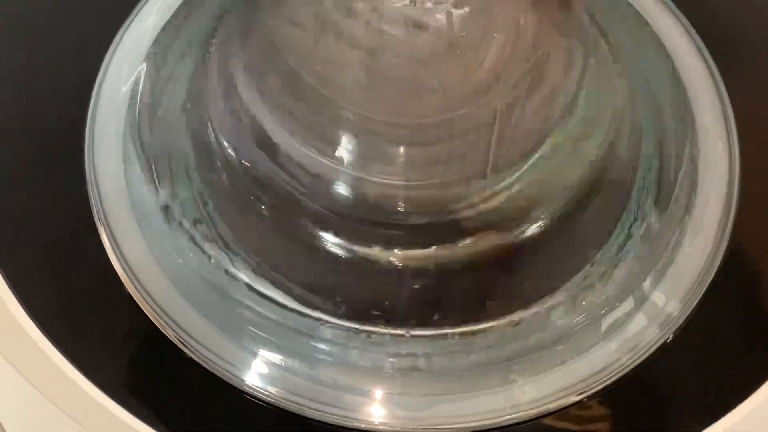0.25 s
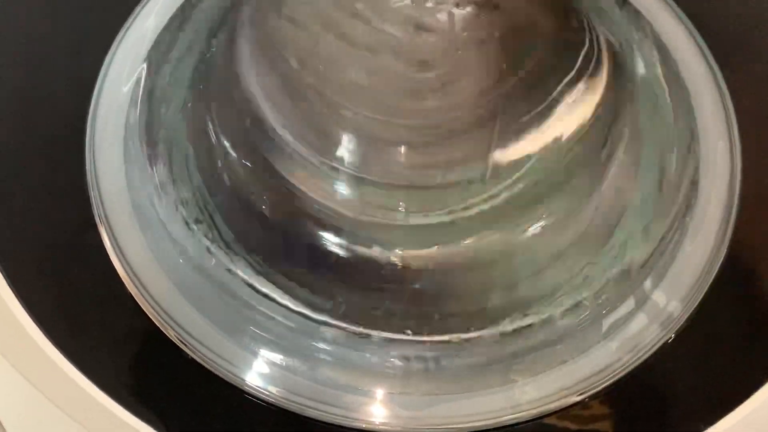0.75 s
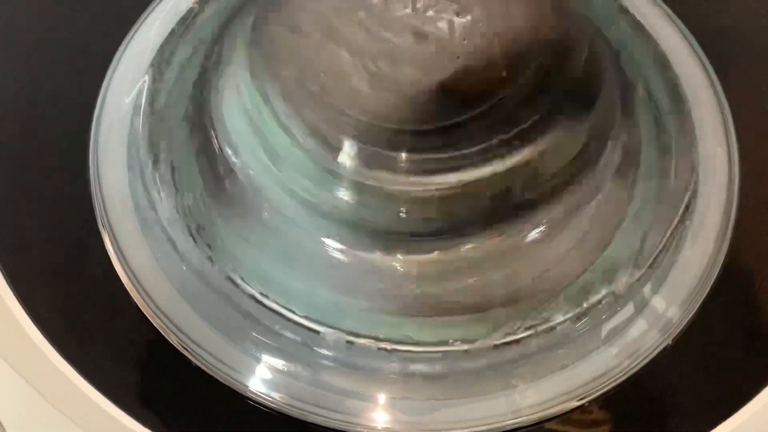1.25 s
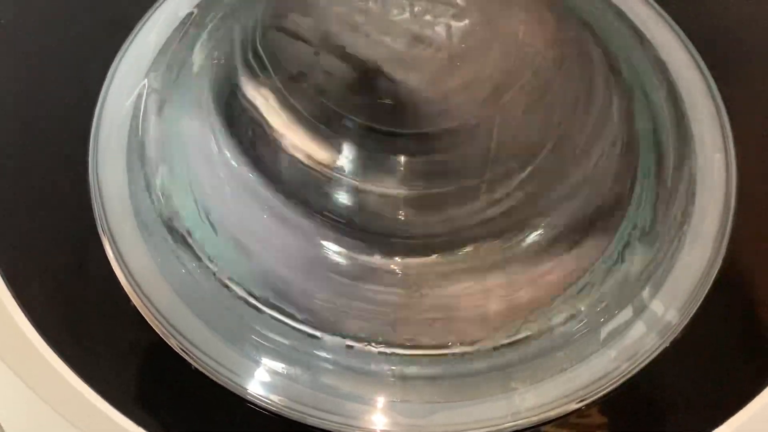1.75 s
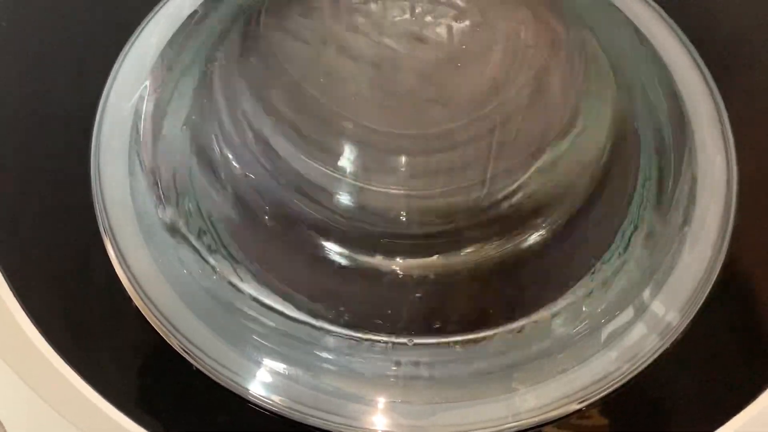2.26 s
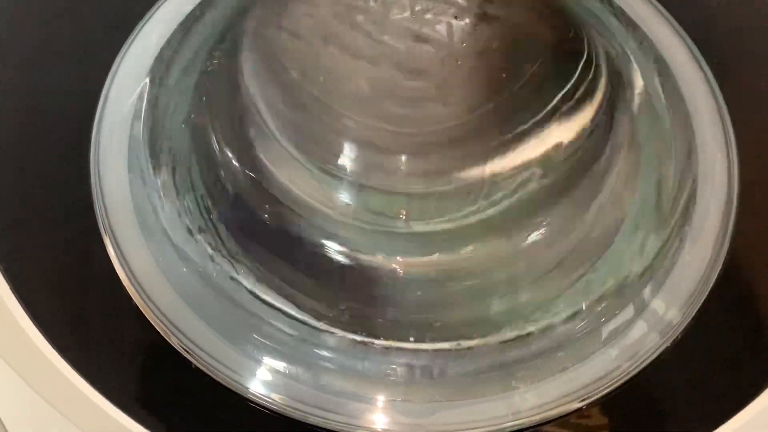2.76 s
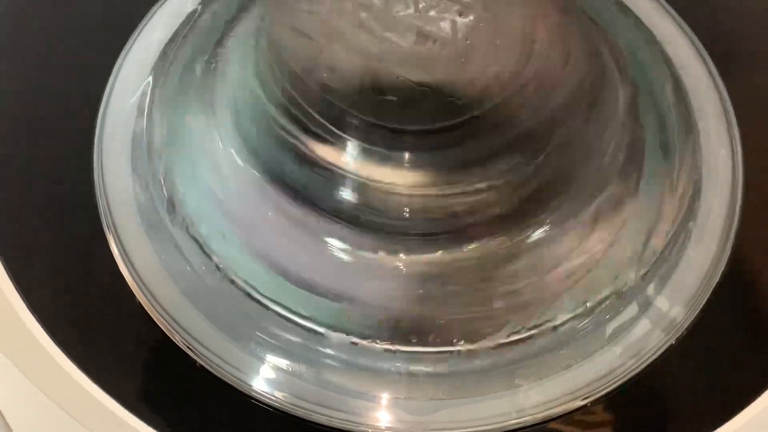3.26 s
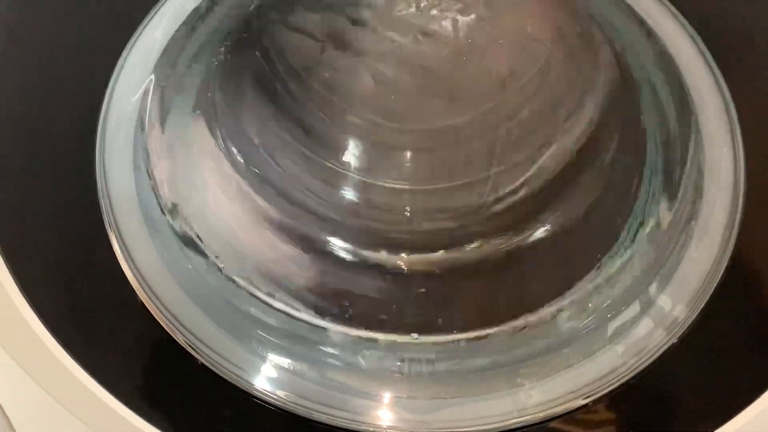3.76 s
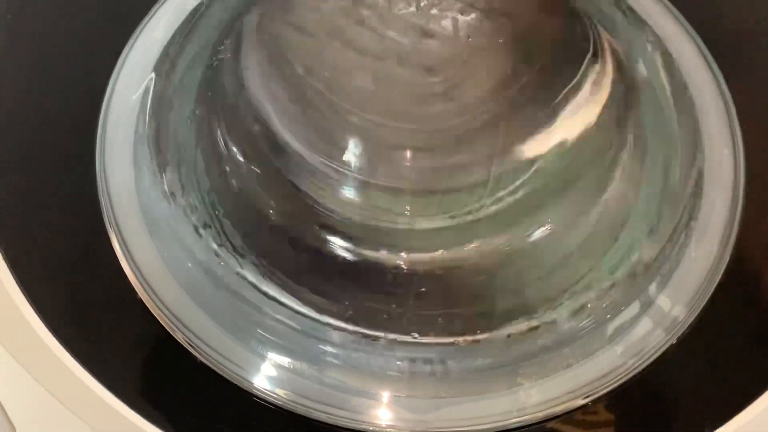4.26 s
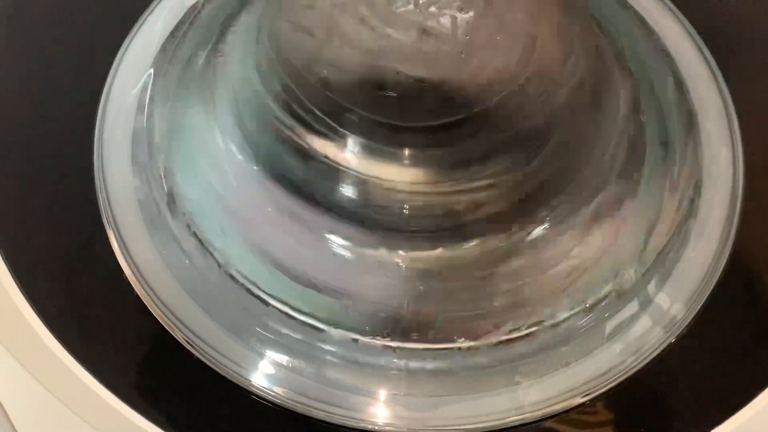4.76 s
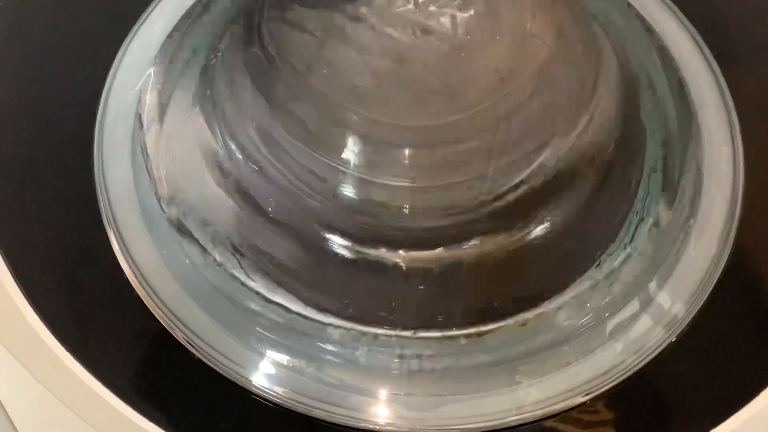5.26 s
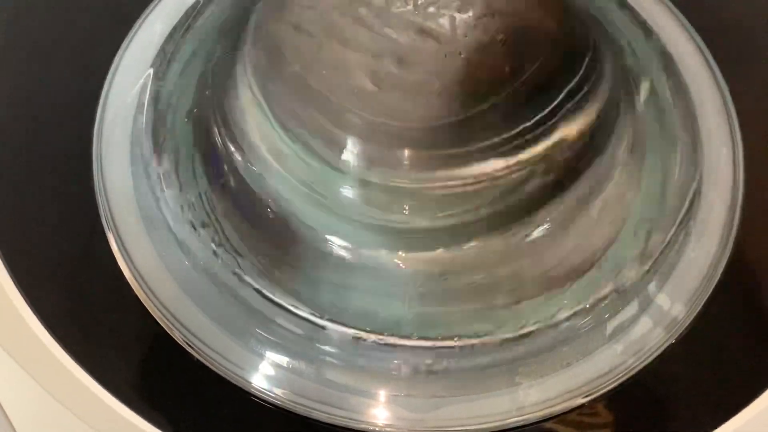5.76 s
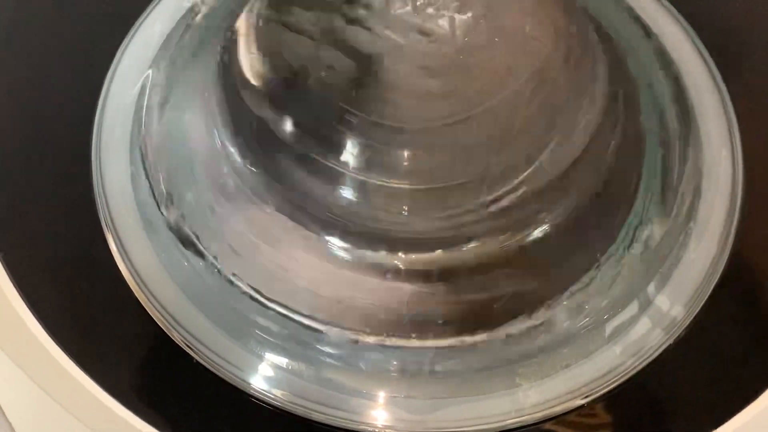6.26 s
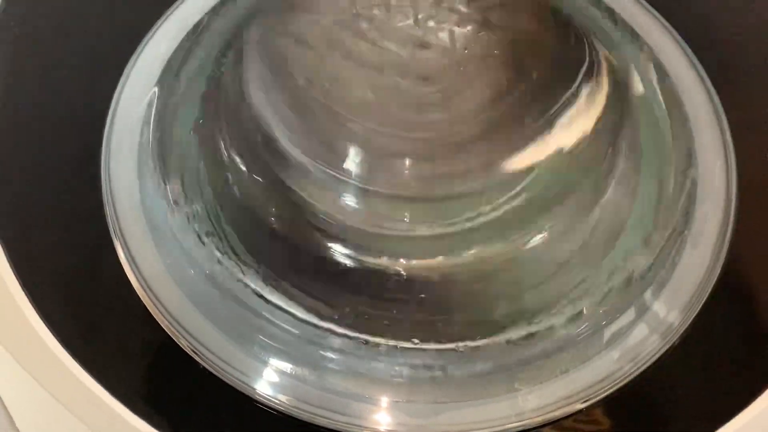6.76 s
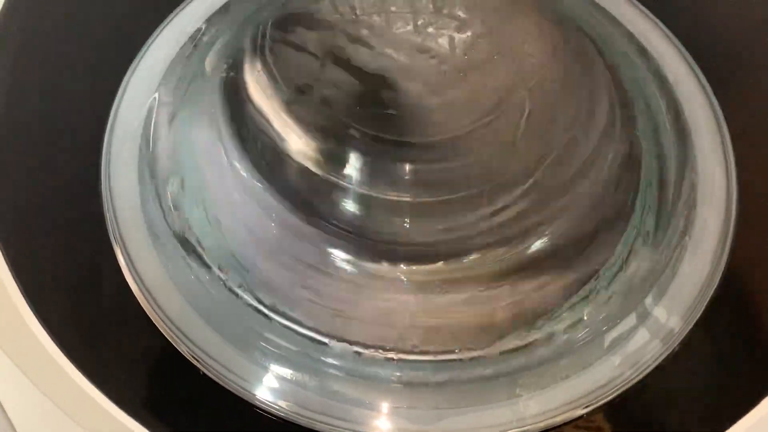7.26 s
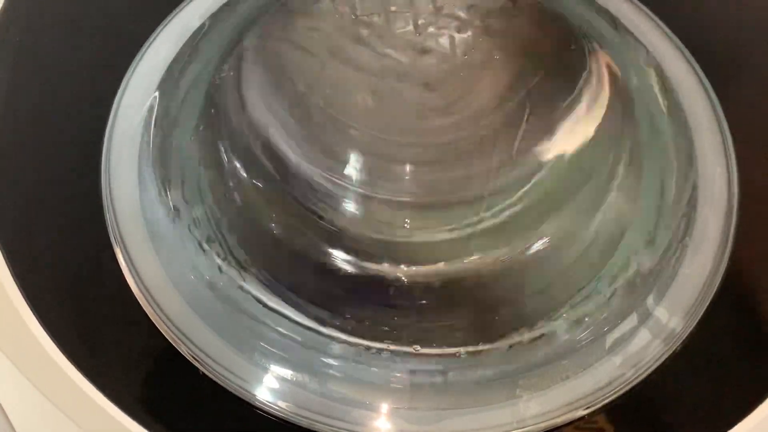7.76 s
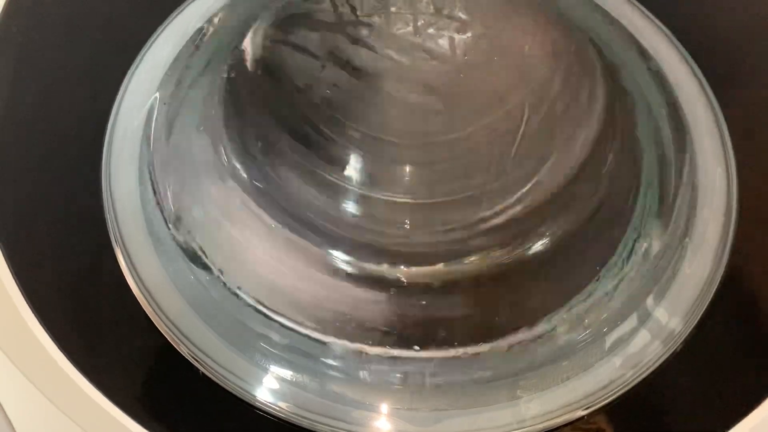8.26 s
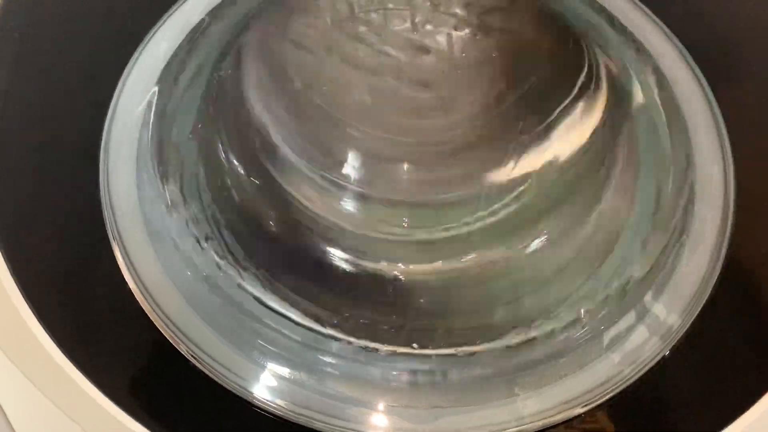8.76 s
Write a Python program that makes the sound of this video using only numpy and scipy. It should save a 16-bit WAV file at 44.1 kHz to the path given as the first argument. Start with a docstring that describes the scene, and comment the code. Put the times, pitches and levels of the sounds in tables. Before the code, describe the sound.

Close to a washer door, rapid low drum knocks pulse steadily and slowly quicken, with bearing rumble, rushing air and thin motor hum.

```python
"""Washing machine gaining spin speed

A front-loading washing machine speeds up slowly in its spin, heard from close to the door.
Each turn, timed blows of the unbalanced drum ring decaying cabinet modes; bearings rumble as turn-locked noise.
Air and motor noise rushes with spectral peaks and dips; a thin whirr of narrow noise comes and goes.
The belt-driven motor hums at multiples of its current; its inverter whines in sidebands, highest near 16 kHz."""
import sys
import numpy as np
from scipy import signal
from scipy.fft import rfft, irfft
from scipy.io import wavfile
from scipy.ndimage import uniform_filter1d

SR = 44100
rng = np.random.default_rng(int(sys.argv[2]) if len(sys.argv) > 2 else 0)


def digitize_waveform(pressure):
    """Quantize a signal to 16-bit integers and store it at the path in sys.argv[1].

    Rows of a 2-D input are taken as channels; values are limited to [-1, 1].
    """
    field = np.atleast_2d(pressure).T
    bounded = np.clip(field, -1, 1)
    quanta = np.round(bounded * 32767).astype(np.int16)
    wavfile.write(sys.argv[1], SR, quanta)


N = 397782

START_TURNS = -.0623  # drum angle at the outset, from the main thump
START_TURNS_PER_S, GAIN_TURNS_PER_S2 = 6.302, .09025
CURRENT_PER_TURN = 21.09  # cycles of motor current per drum turn


def gain_of(db):
    """dB to gain."""
    return 10 ** (np.asarray(db) / 20)


def evened(x):
    """Scales to rms 1."""
    return x / np.sqrt(np.mean(x ** 2) + 1e-20)


def read(points, hz):
    """Interpolates a table on a log-frequency axis."""
    f, value = np.transpose(points)
    return np.interp(np.log(hz + 1), np.log(f + 1), value)


def drift(per_s):
    """Slow random signal from smoothed knots of rms 1."""
    count = int(N / SR * per_s) + 8
    knots = uniform_filter1d(rng.standard_normal(4 * count), size=4)
    return np.interp(np.arange(N) / SR * per_s * 4, np.arange(4 * count), evened(knots))


def speed(s):
    """Drum speed in turns/s, rising linearly with time in s."""
    return START_TURNS_PER_S + GAIN_TURNS_PER_S2 * s


def drum():
    """Drum angle in turns, the running sum of speed."""
    return START_TURNS + np.cumsum(speed(np.arange(N) / SR)) / SR


# chosen left-right likeness, alternating sides of zero in the treble, clipped to +-.99 when read:
# (frequency [Hz], likeness [-])
LIKENESS = [(30, .9), (60, .975), (130, .95), (290, .9), (500, .45), (770, .3), (1200, 0), (1800, 0),
            (2700, .2), (4200, 0), (6820, .14), (7500, -.1), (8700, -3.5), (11000, 3.5), (13200, -2.6),
            (15000, 2)]


def shaped(x, spectrum_db, paths=.5):
    """Colours two noises and mixes them to a set left-right likeness per frequency; rms 1."""
    hz = np.fft.rfftfreq(N, 1 / SR)
    same = np.clip(read(LIKENESS, hz), -.99, .99)
    mid, side = rfft(x)
    # part of the difference is the same sound by other paths, its phase turning with frequency
    phase_steps = 1.3 * np.cumsum(rng.standard_normal(SR // 100))
    turn_rad = np.interp(hz, np.arange(0, SR / 2, 50), phase_steps)
    other_paths = paths * mid * np.exp(1j * turn_rad)
    side = other_paths + np.sqrt(1 - min(paths, .99) ** 2) * side
    colour = gain_of(spectrum_db(hz))
    mid = mid * colour * np.sqrt(1 + same)
    side = side * colour * np.sqrt(1 - same)
    return evened(irfft(np.array([mid + side, mid - side]), N))


# air and motor noise: (frequency [Hz], relative density [dB per Hz])
AIR = [(190, -44), (330, -2), (492, -12), (745, -11), (862, -15), (972, -14), (1050, -14), (1530, -12.5),
       (1800, -13.5), (2100, -18), (2510, -24), (3140, -23), (3700, -24.5), (4570, -29), (6820, -32.5),
       (7600, -35.5), (8000, -102), (10400, -99), (17600, -120)]
AIR_DB = -42
# peaks and dips in the rush: (frequency [Hz], width [Hz], level relative to the rush [dB])
PEAKS_AND_DIPS = [(444, 25, 5), (482, 20, -4), (748, 30, 2), (780, 110, 2), (952, 18, 4), (980, 18, 6),
                  (1178, 25, 3.5), (1253, 20, 5), (1292, 30, -5), (1450, 50, 1.5), (1826, 20, 3),
                  (2095, 60, 3), (2240, 35, 5.5), (2300, 50, -2), (2385, 70, 5), (2480, 40, -3),
                  (2555, 25, 4), (2662, 40, 5), (2830, 45, 6), (3135, 80, 4), (3225, 40, 3), (6640, 180, 4)]
# top of the rush: (frequency [Hz], relative density [dB per Hz])
TOP = [(7000, -20), (7800, -3), (8600, 0), (9400, -6), (10100, -4), (10900, -9), (12000, -6), (13400, -6),
       (14300, -11), (15800, -9)]
TOP_DB = -64.5


def rush(angle, throb_db=-0.14, lead_turns=0.042, lag_turns_per_octave=0.03, rise_db=1.5,
         waver_db=0.67, low_throb_db=0.67, top_throb_db=1.5, gust_db=0.18):
    """Air and motor noise with peaks and dips, in patches; it swells once a turn, low bands first."""
    def air_colour(hz):
        bumps_db = sum(db / (1 + (2 * (hz - f) / width) ** 4) for f, width, db in PEAKS_AND_DIPS)
        return read(AIR, hz) + bumps_db

    def top_colour(hz):
        return read(TOP, hz) - 60 * (hz < TOP[0][0])

    air = gain_of(AIR_DB) * shaped(rng.standard_normal((2, N)), air_colour)
    top = gain_of(TOP_DB) * shaped(rng.standard_normal((2, N)), top_colour)
    top = top * gain_of(rise_db * np.linspace(-1, 1, N) + top_throb_db * drift(9))  # brightens, flickers

    hz, t, z = signal.stft(air + top, SR, nperseg=512, noverlap=384)
    band_hz = hz[:, None]
    frame = np.minimum(t * SR, N - 1).astype(int)
    patches = uniform_filter1d(rng.standard_normal(z.shape[1:]), 3, axis=0)
    patches = evened(uniform_filter1d(patches, 15, axis=1))
    lag_turns = lag_turns_per_octave * np.log2(band_hz / 1000 + .1)
    place = np.interp(t, np.arange(N) / SR, angle) + lead_turns - lag_turns
    depth_db = .4 + throb_db + low_throb_db / (1 + (band_hz / 1300) ** 6)
    swell_db = depth_db * np.cos(2 * np.pi * place)
    for f, _, _ in PEAKS_AND_DIPS:  # the band around each rises and falls in its own time
        near = np.exp(-.5 * ((band_hz - f) / 90) ** 2)
        swell_db = swell_db + waver_db * near * drift(5.5)[frame]
    swell_db = swell_db + 1.9 * patches + gust_db * drift(8)[frame]
    return signal.istft(z * gain_of(swell_db), SR, nperseg=512, noverlap=384)[1][:, :N]


# bearings through the cabinet: (frequency [Hz], relative density [dB per Hz])
BEARINGS = [(25, -16), (32, -22), (45, -16), (60, -9), (80, 0), (100, -2), (125, -2), (160, -2), (200, -4),
            (250, -8), (310, -8), (400, -17.5), (600, -20.5), (1200, -76)]
BEARINGS_DB = -36.5


def rumble(angle, memory_turns=3.5, fresh=.4, throb_db=1.0, lead_turns=.1):
    """Bearing roughness repeats each turn, changes over a few turns; loudest under the heavy side."""
    size, count = 512, int(angle[-1]) + 3  # points per turn, turns
    fade = np.exp(-.5 * (np.arange(-12, 13) / memory_turns) ** 2)[None, :, None]
    repeated = evened(signal.fftconvolve(rng.standard_normal((2, count, size)), fade, "same"))
    pattern = (repeated + fresh * rng.standard_normal((2, count, size))).reshape(2, -1)
    point = (angle + 1) * size
    rough = np.array([np.interp(point, np.arange(count * size), p) for p in pattern])
    throb = gain_of(throb_db * np.cos(2 * np.pi * (angle + lead_turns)))
    return gain_of(BEARINGS_DB) * throb * shaped(rough, lambda hz: read(BEARINGS, hz))


# thin whirr that comes and goes, before its throb: (time [s], level [dB])
WHIRR_LEVEL = [(0.0, -69), (0.05, -62), (0.58, -53), (0.63, -66), (0.9, -54), (1.8, -70), (1.9, -46),
               (2.18, -66), (2.28, -50), (2.53, -67), (2.93, -58), (6.97, -56), (7.07, -70), (7.12, -50),
               (7.67, -51), (7.69, -70), (8.27, -53), (9.0, -58)]
WHIRR_HZ, WHIRR_WIDTH_HZ = 1543, 10


def whirr(angle, throb_db=-1.5, wobble_rad=1.7):
    """Noise in one narrow panel resonance, pulsing with the drum."""
    hz = np.fft.rfftfreq(N, 1 / SR)
    resonance = 1 / (1 + (2 * (hz - WHIRR_HZ) / WHIRR_WIDTH_HZ) ** 2)
    sing = irfft(rfft(rng.standard_normal((2, N))) * resonance, N)
    sing = sing * (1 + np.cos(wobble_rad * drift(9)))  # wavers
    level_db = np.interp(np.arange(N) / SR, *np.transpose(WHIRR_LEVEL))
    level_db = level_db + throb_db * np.cos(2 * np.pi * angle)
    return gain_of(level_db) * evened(sing)


# how loud the cabinet passes the hum at each pitch: (frequency [Hz], level [dB])
HUM_LEVEL = [(532, -64), (542, -56), (549, -58), (555, -57), (559, -52), (566, -50), (573, -51), (578, -59),
             (586, -57), (592, -59), (596, -65), (600, -70), (664, -60), (690, -60), (703, -64), (712, -63),
             (719, -59), (724, -61), (729, -55), (743, -54), (748, -62), (752, -68)]
# hum partials: (multiple of current [-], left minus right [dB], left lead [rad])
HUM_PARTIALS = [(4, -5, .2), (5, 2.5, .5)]


def hum(angle):
    """Two multiples of the motor current, loud where they cross a cabinet resonance."""
    out = 0
    for multiple, pan_db, lead_rad in HUM_PARTIALS:
        hz = multiple * CURRENT_PER_TURN * speed(np.arange(N) / SR)
        side_db = np.array([[pan_db], [-pan_db]]) / 2
        level = gain_of(read(HUM_LEVEL, hz) + 1.0 * drift(5) + side_db)
        phase_rad = 2 * np.pi * multiple * CURRENT_PER_TURN * angle + np.array([[lead_rad], [0]])
        out = out + np.sqrt(2) * level * np.cos(phase_rad)
    return out


# inverter lines, level before the common fade:
# (multiple of half the switching [-], multiple of current added [-], level [dB], left lead [rad])
WHINE_LINES = [(2, -4, -62.5, .8), (2, -6, -74, .8), (2, -10, -69.5, .8), (2, -16, -79, 2.8),
               (1, 0, -82, 2.2), (1, 4, -77, 2.8)]
SWITCH_HZ = 16121
WHINE_START_DB, WHINE_FADE_DB_PER_S = 3, 0.5


def whine(angle, shake=1.0, wander_rad=0.94, fuzz=0.26, fuzz_per_s=92.0):
    """Inverter lines; shaking makes the sidebands flutter at multiples of the drum speed."""
    t, out = np.arange(N) / SR, 0
    fade_db = WHINE_START_DB - WHINE_FADE_DB_PER_S * t  # weakens steadily with time
    for half, multiple, db, lead_rad in WHINE_LINES:
        if round(multiple):
            flutter = 1
            for k in (-3, -2, -1, 1, 2, 3, 4):
                shake_rad = 2 * np.pi * (k * angle + rng.random()) + wander_rad * drift(1.9)
                flutter = flutter + shake * np.exp(1j * shake_rad)
            # irregular current smears the line
            flutter = flutter + fuzz * (drift(fuzz_per_s) + 1j * drift(fuzz_per_s))
        else:
            flutter = 1 + 1.8 * drift(2.9)  # no current added: slow level changes only
        turns = round(half) * SWITCH_HZ / 2 * t + round(multiple) * CURRENT_PER_TURN * angle
        tone = flutter * np.exp(2j * np.pi * turns) * np.exp(1j * np.array([[lead_rad], [0]]))
        out = out + gain_of(db + fade_db) * evened(tone.real)
    return out


# blows of each turn, a rattle up to the main thump and rebounds after it: (delay from main thump [ms],
# contact [ms], level at best speed [dB], best drum speed [turns/s], reach [turns/s])
BLOWS = [(-56.3, 1.97, -32.5, 6.48, .16), (-51.9, 2.04, -28.5, 6.67, .23), (-40.4, 2.14, -23.5, 6.51, .22),
         (-31.5, 1.69, -19.3, 6.57, .3), (-25.3, 1.48, -25, 6.98, .12), (-22.5, 3.38, -12.9, 6.58, .35),
         (-17.4, 1.04, -24, 6.89, .18), (-12, 1.57, -17.7, 7.26, 2), (.7, 1.56, -15.2, 7.3, 1.25),
         (6.7, 1.54, -19.4, 6.81, .38), (12.1, 5, -14.2, 7.08, .2), (18.7, 2.96, -13, 6.97, .51),
         (23.2, 1.2, -28, 6.91, .14), (25.4, 1.43, -15.6, 7.3, .37), (30.9, 1.48, -22.2, 6.72, .42),
         (35.5, 3.46, -12.9, 7.05, .22), (40.5, 1.6, -19.1, 6.47, .27), (49.3, 1.71, -21.5, 6.34, .21),
         (58.6, 3.15, -15.5, 6.01, .52), (62, 2.08, -20.2, 6.43, .2), (69.4, 2.03, -17, 6, .74),
         (79.1, 5, -15.1, 6.55, .36), (86.9, 1.58, -32, 6.61, .15)]
# cabinet modes: (frequency [Hz], level [dB], t60 [s])
CABINET_MODES = [(34, .3, .025), (69, -4.5, .101), (114.6, -17.5, .158), (165.2, -21.6, .112),
                 (224.8, -18, .2), (290.7, 13.2, .073), (332, -9.5, .133)]


def knocks(angle, uneven_db=.5, loose_ms=.1, swing_db=.6, settle_db=1.6, settle_s=2.5):
    """The swinging tub strikes in the same rhythm every turn; each blow rings the cabinet."""
    t, turn = np.arange(N) / SR, np.arange(0, int(angle[-1]) + 1)
    hz, force = np.fft.rfftfreq(2 * N, 1 / SR), 0
    thump_s = np.interp(turn, angle, t)
    swing = swing_db * rng.standard_normal(len(turn))
    # blows start louder and settle over the first seconds
    swing = swing + settle_db * np.exp(-thump_s / settle_s)
    for delay_ms, contact_ms, level_db, best, reach in BLOWS:
        chance = rng.standard_normal((len(turn), 2))
        s = thump_s + (delay_ms + loose_ms * chance[:, 0]) / 1000
        heard = (s >= 0) & (s < t[-1])
        speed_match = np.exp(-.5 * ((speed(s) - best) / reach) ** 2)
        pull = gain_of(level_db + swing + uneven_db * chance[:, 1]) * speed_match
        train = np.zeros(N)
        train[(s[heard] * SR).astype(int)] = -pull[heard]
        softness = np.exp(-.5 * (2 * np.pi * hz * contact_ms / 1000) ** 2)  # long contact dulls
        force = force + rfft(train, 2 * N) * softness
    ring_t = t[:SR]
    ring = sum(gain_of(db - 60 * ring_t / t60) * np.cos(2 * np.pi * f * ring_t)
               for f, db, t60 in CABINET_MODES)
    return irfft(force * rfft(ring, 2 * N))[:N]


def scene():
    """All parts follow one drum angle; the boom reaches the right side 8 samples earlier."""
    angle = drum()
    boom = knocks(angle)
    late_boom = np.r_[np.zeros(8), boom][:N]
    boom = np.array([late_boom, boom]) * gain_of([[1.5], [.5]])
    return rush(angle) + rumble(angle) + whirr(angle) + hum(angle) + whine(angle) + boom


EDGE_HZ = 15780  # upper band limit


def record(dry):
    """The microphone rolls off the bass and the recorder cuts the deepest of it; then the band limit."""
    thinned = signal.sosfilt(signal.butter(2, 40, "highpass", fs=SR, output="sos"), dry)
    hz = np.fft.rfftfreq(N, 1 / SR)
    cut = irfft(rfft(thinned) / np.sqrt(1 + (30 / (hz + 1)) ** 16), N)
    lowpass = signal.firwin(1023, EDGE_HZ, window=("kaiser", 9), fs=SR)
    return signal.oaconvolve(cut, lowpass[None], "same")


dry = scene()
out = record(dry)
digitize_waveform(out)
```